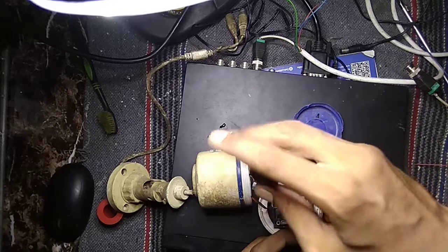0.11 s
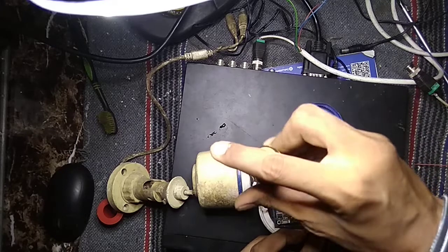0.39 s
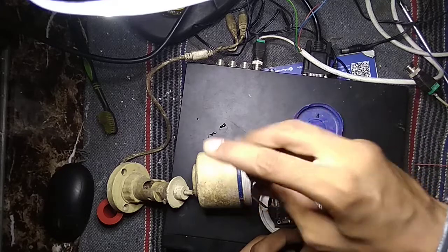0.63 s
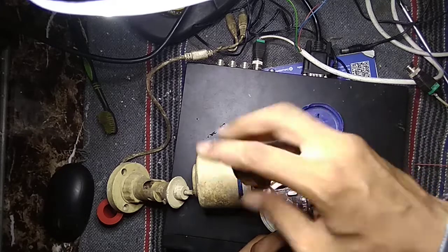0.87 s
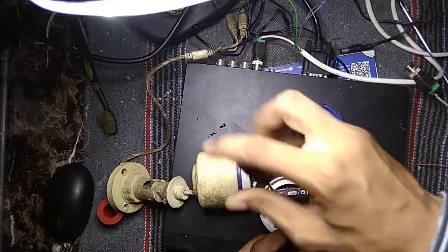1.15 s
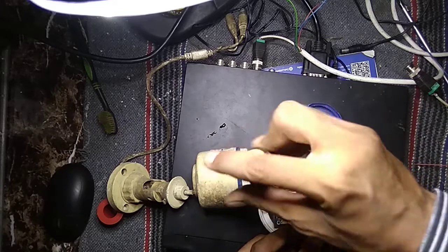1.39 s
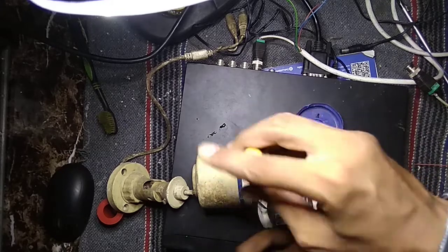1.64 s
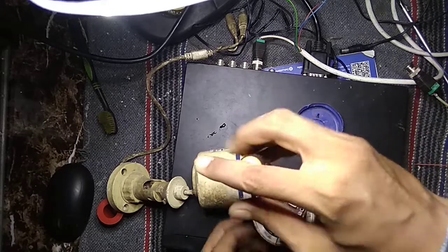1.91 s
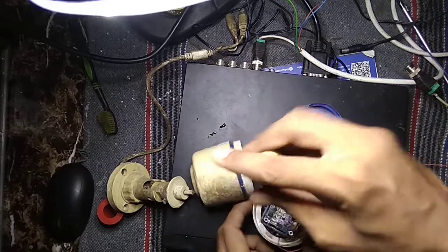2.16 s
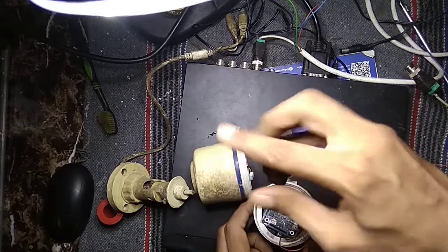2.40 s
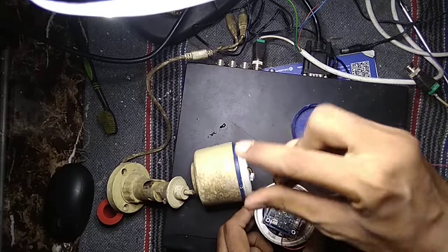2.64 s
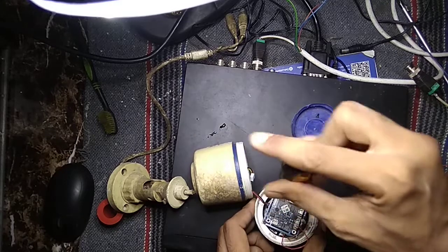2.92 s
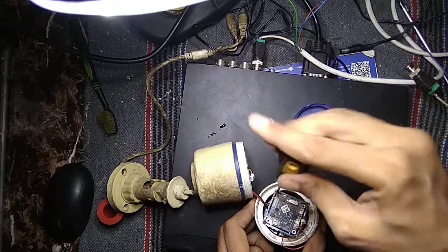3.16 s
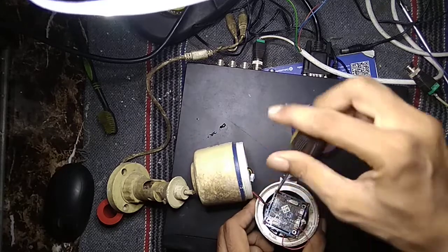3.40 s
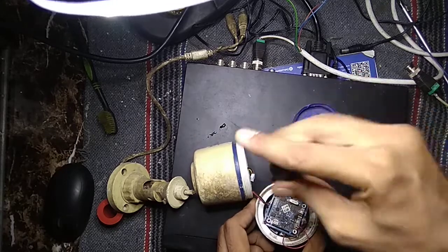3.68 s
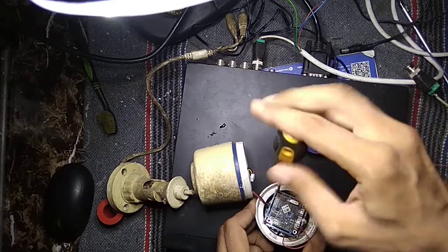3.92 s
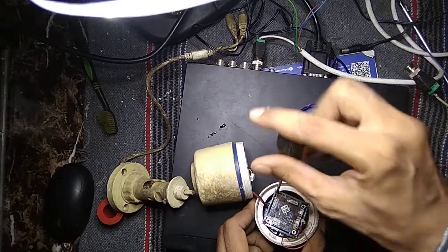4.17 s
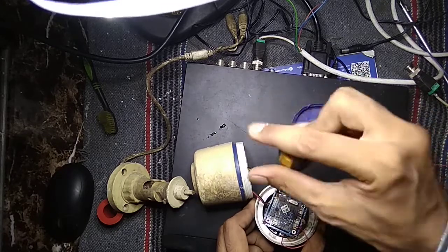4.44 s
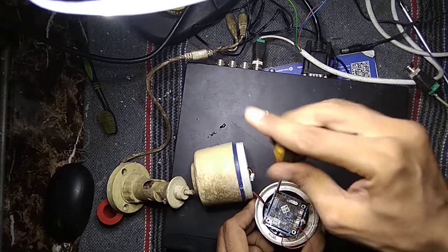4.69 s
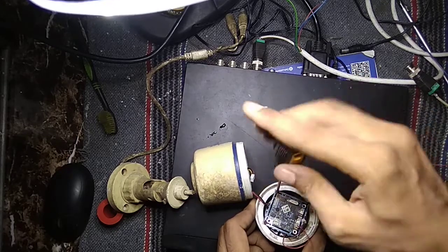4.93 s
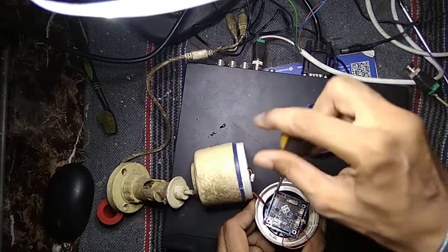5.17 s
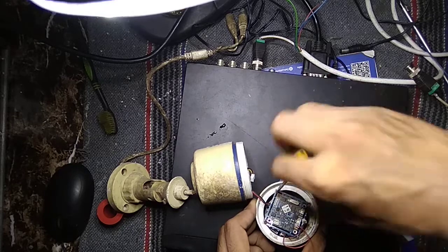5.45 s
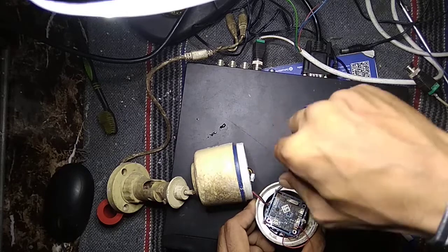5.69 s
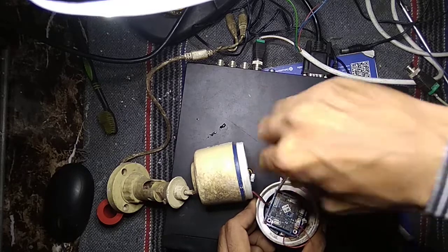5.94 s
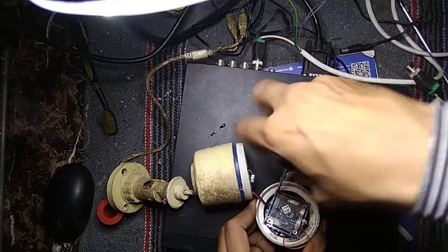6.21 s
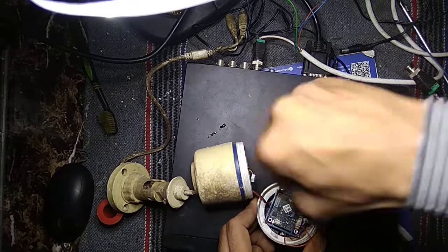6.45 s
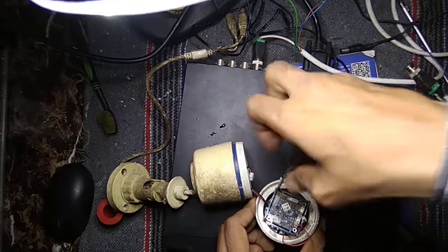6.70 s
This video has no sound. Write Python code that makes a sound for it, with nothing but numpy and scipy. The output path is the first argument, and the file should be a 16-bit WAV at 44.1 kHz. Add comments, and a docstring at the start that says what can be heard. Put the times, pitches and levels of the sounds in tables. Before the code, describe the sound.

Close to the microphone, a small screwdriver works in a plastic housing on a hollow bench. A low wavering hum opens, with a strong double knock almost at once. Gritty scrapes and light plastic pings follow. The steady hum fades after two seconds, leaving a swelling murmur under scattered knocks, one hard near five seconds, then faint taps and a quick closing flurry in a small room.

```python
"""Hands turn a small screwdriver in a plastic lamp housing on a hollow workbench, close to a phone.
A low wavering hum is there from the start, and strong knocks soon ring the bench top and rattle the housing.
Gritty scrapes, light pings of the shell and thin squeaks of hiss come in between; the hum's steady tone
fades out after about two seconds, leaving a murmur that swells and sinks. More knocks follow, one of them
hard at 4.8 s, then faint taps and a closing flurry. A small room answers, over faint microphone hiss."""
import sys
import numpy as np
from scipy import signal
from scipy.io import wavfile
from scipy.ndimage import uniform_filter1d

SR = 44100
rng = np.random.default_rng(int(sys.argv[2]) if len(sys.argv) > 2 else 0)


def int16_out(signal):
    """Quantize to a 16-bit WAV file."""
    q = np.round(np.clip(np.atleast_2d(signal).T, -1, 1) * 32767)
    wavfile.write(sys.argv[1], SR, q.astype(np.int16))


def voltage_ratio(decibels):
    """Convert decibels (scalar or array-like) to amplitude ratios, 20 dB per decade."""
    exponent = np.asarray(decibels, float) / 20
    return 10 ** exponent


N = 301323  # length of the scene in samples

# microphone hiss: (frequency [Hz], relative level per Hz [dB])
HISS_SPECTRUM = [(700, 0.5), (1300, -4.5), (5000, -14), (11800, -12.5), (12900, -24), (15800, -24.5)]
HISS_DB = -87.5
# swells of the hum: (start [s], length [s], hum level at the start [dB], fade [dB per s],
# rumble relative to the hum [dB])
HUM_SWELLS = [(-.1, 0.59, -29.5, 27.5, -11), (0.408, 0.17, -52, 4, 1.5), (0.546, 1.37, -38, 14, -6),
              (1.753, 1.1, -41, 14.5, -7.5), (2.247, 0.16, -49.5, 5, 0), (2.383, 0.73, -37, 41.5, -2.5),
              (2.958, 0.59, -52, 6, -7), (3.654, 0.37, -53, 10, -6.5), (4.014, 0.7, -46.5, 34.5, -1.5),
              (4.758, 0.26, -45.5, 56, -3), (5.083, 0.504, -60, -11, -8), (5.577, 0.13, -56.5, 17, 1),
              (5.859, 0.29, -63, -23, -2.5), (6.217, 0.14, -63.5, 6, -7), (6.42, 0.54, -55, -4, 0.5)]
SWELL_RISE_S, SWELL_DROP_S, QUIET_DB = 0.073, 0.047, -72.5
# faint steady tones above the hum: (frequency [Hz], relative level [dB])
UPPER_HUM_TONES = [(110, -19.5), (150, -11.5), (352, -28.5)]
TONE_ENDS_S, TONE_FADE_S = 2.33, 0.3  # the steady tones are gone at the first; the fade comes just before
# rumble bands above the hum: (frequency [Hz], width [Hz], relative level [dB])
RUMBLE_BANDS = [(86.3, 18, -2), (110.6, 16, -5.5), (142.75, 17, -5.5), (235, 19, -24.5)]
# how long the small room rings: (frequency [Hz], time to fall by 60 dB [s])
ROOM_DECAY = [(300, 0.39), (1500, 0.25), (3500, 0.24), (12000, 0.25)]
# thin squeaks of hiss: (start [s], length [s], level before the swell [dB], first pitch [Hz], last pitch [Hz])
SKIN_SQUEAKS = [(0.663, 0.22, -65, 13740, 14570), (5.411, 0.21, -67, 14700, 14970),
                (5.524, 0.22, -69.5, 11470, 11270), (5.591, 0.24, -66.5, 10600, 10760),
                (6.344, 0.11, -63.5, 12740, 13150), (6.616, 0.25, -66.5, 11800, 13660)]
# light touches that ring one mode of the shell, and the bright cracks of the knocks at 4.1 s and 4.8 s: (start
# [s], frequency [Hz], starting level [dB])
SHELL_PINGS = [(3.782, 2030, -64.5), (1.659, 2330, -65.5), (2.57, 2330, -71), (2.979, 2400, -56.5),
               (4.065, 1670, -61), (4.265, 2330, -68), (4.305, 2270, -68.5), (4.102, 2565, -47),
               (4.584, 2220, -65.5), (4.775, 2330, -59), (4.796, 2570, -49), (5.11, 2380, -63.5),
               (5.63, 2230, -65.5)]
PING_RISE_S, PING_T60_S, PING_WIDTH_HZ = 0.0022, 0.049, 260
# ringing of the housing shell: (frequency [Hz], width [Hz], relative level [dB])
SHELL_MODES = [(1650, 77, -7.5), (2026, 250, -4.5), (2330, 130, -4), (2680, 89, -9.5), (3520, 210, -12.5)]
# colour of the housing rattle: (frequency [Hz], relative level per Hz [dB])
RATTLE_COLOUR = [(600, -2.5), (1000, 7.5), (1280, 6), (1650, 9), (2450, 1.5), (3000, -8), (4200, -8.5),
                 (6500, -20.5)]
# colour of the metal tip, lowest rasp first: (frequency [Hz], relative level per Hz [dB])
TIP_COLOUR = [(3200, -8.5), (7000, -2.5), (9000, 1), (13000, 4.5), (15500, 0.5), (16000, -20.5)]
# ringing of the bench top: (frequency [Hz], relative level [dB], time to fall by 60 dB if not held [s],
# left minus right [dB])
BENCH_MODES = [(134.1, -11.5, 0.18, 2.5), (337.8, -1.5, 0.14, 4.5), (376.4, -5, 0.21, 2),
               (480.3, 3.5, 0.097, 6.5), (537.1, -10.5, 0.15, 4.5), (634.8, -10.5, 0.11, -3),
               (745, -25.5, 0.17, 11), (883.4, -26, 0.15, 9), (988, -25, 0.11, -6),
               (1090.5, -28.5, 0.055, -5.5)]
# faint shuffling on the bench: force when the rumble is at -55 dB, and its change in dB per dB of rumble
SHUFFLE_DB, SHUFFLE_FOLLOWS = -73, 0.94
# scrapes: (start [s], length [s], starting force on the bench [dB], on the housing [dB], at the tip [dB])
SCRAPE_STROKES = [(0.974, 0.093, -77, -84, -75), (1.668, 0.18, -35, -50, -50),
                  (2.052, 0.16, -49.5, -76.5, -67.5), (2.078, 0.062, -68, -80, -55.5),
                  (2.89, 0.16, -59.5, -88, -87), (4.248, 0.14, -65.5, -100, -93.5),
                  (4.766, 0.028, -49, -81, -88.5), (5.091, 0.092, -75, -80, -79),
                  (3.244, 0.066, -77, -84, -76), (5.361, .05, -71, -96, -65),
                  (6.505, 0.064, -54.5, -73.5, -64), (5.85, .4, -67, -94, -95),
                  (6.71, 0.12, -42.5, -73.5, -70.5)]
# for bench, housing and tip: (share of the stroke until full force [0 to 1])
FULL_GRIP_SHARE = [0.15, 0.34, 0.53]
# for bench, housing and tip: (change of force over the stroke [dB])
FORCE_CHANGE_DB = [-10.5, 5, 1.5]
LIFT_S = 0.031  # how long the hand takes to let go
# knocks: (time [s], peak of the thud [dB], tilt towards the low bench modes [dB],
# housing force relative to the thud [dB], tip force relative to the thud [dB])
BENCH_KNOCKS = [(0.294, -27, -0.5, -17.5, -34), (0.311, -16, 3, -22, -38.5),
                (0.677, -43.5, -4.5, -22.5, -22.5), (0.706, -34.5, 0.5, -28, -31),
                (1.213, -47, 3.5, -32.5, -31.5), (1.297, -53, -6.5, -33, -40), (2.211, -30, -5.5, -45, -38),
                (2.219, -31, 0.5, -13, -27), (2.315, -34, -2.5, -25.5, -36.5),
                (2.428, -42.5, 9, -44.5, -47), (2.491, -44.5, 13, -47, -50), (2.61, -32, -1.5, -24, -31.5),
                (2.677, -38.5, -0.5, -25.5, -39), (2.927, -50, 3.5, -42.5, -48),
                (2.974, -39, 0.5, -28, -31), (3.198, -52, -1.5, -21, -43), (3.696, -51, -4, -26, -41),
                (3.77, -37.5, -0.5, -24.5, -29.5), (3.823, -45, -6, -39, -30.5),
                (4.025, -46, 3.5, -44, -37), (4.097, -33, -0.5, -21, -32), (4.292, -49.5, -19, -41, -24),
                (4.599, -53.5, -7, -25, -38), (4.794, -22, -3.5, -32, -41), (5.337, -54, 6, -31, -23),
                (5.437, -53.5, -10, -26, -22.5), (5.827, -52.5, -5.5, -32, -23),
                (5.939, -53, -4.5, -24, -40), (5.976, -43.5, -2.5, -30, -42), (6.196, -46.5, 1.5, -33, -48),
                (6.224, -44, 0.5, -39.5, -37), (6.384, -45, 3, -30, -36), (6.484, -40.5, -3, -25, -37),
                (6.499, -39, -3.5, -32, -42), (6.56, -38.5, -2, -30, -43), (6.606, -36.5, 0, -17.5, -33.5),
                (6.73, -29.5, -8.5, -25, -31), (6.754, -36, -3, -21.5, -27), (6.824, -35.5, 5, -29, -41)]
CONTACT_S = 0.0071  # how long a landing takes to reach full load
SNAP_S = 0.011  # the housing snap is strongest this long after the knock's listed time
LEFT_LAG_SAMPLES = 15  # sound through the air reaches the left side later


def evened(x):
    """Scales a sound to rms 1."""
    return x / np.sqrt(np.mean(x ** 2) + 1e-20)


def read(points, hz):
    """Reads a table at the frequencies hz, along a logarithmic frequency scale."""
    f, value = np.transpose(points)
    return np.interp(np.log(hz + 1), np.log(f + 1), value)


def add(mix, s, sound):
    """Lays a sound into the mix at s seconds."""
    part = mix[..., round(s * SR):][..., :sound.shape[-1]]
    part += sound[..., :part.shape[-1]]


def colour(x, points):
    """Gives noise the listed spectrum with a short filter of energy 1."""
    hz = np.linspace(0, SR / 2, 257)
    outside = (hz < points[0][0]) | (hz > points[-1][0])
    taps = signal.firwin2(255, hz, voltage_ratio(np.where(outside, -80, read(points, hz))), fs=SR)
    return signal.oaconvolve(x, (taps / np.linalg.norm(taps))[None], "same", axes=1)


def resonate(x, hz, width):
    """A resonance that follows the curve hz: shift it down to zero, smooth twice, shift back up."""
    turn = np.exp(2j * np.pi * np.cumsum(hz * np.ones(x.shape[-1])) / SR)
    r = np.exp(-np.pi * width / SR)
    once = signal.lfilter([1 - r], [1, -r], x / turn)
    twice = signal.lfilter([1 - r], [1, -r], once)
    return 2 * (turn * twice).real


def ramp(t, length, rise, drop):
    """Smooth rise, hold and drop within a span."""
    return np.sin(np.pi / 2 * np.clip(np.minimum(t / rise, (length - t) / drop), 0, 1)) ** 2


def grit(shape, per_s, spread_db):
    """Sparse contacts of random sign and very uneven size, rms 1."""
    size = voltage_ratio(spread_db * np.minimum(rng.exponential(1, shape), 4))
    happens = rng.random(shape) < per_s / SR
    return evened(size * rng.standard_normal(shape) * happens)


def microphone_hiss():
    """Steady coloured noise, independent in the two microphones."""
    return voltage_ratio(HISS_DB) * colour(rng.standard_normal((2, N)), HISS_SPECTRUM)


def room(x):
    """Sparse echoes of random sign, each band dying at its own speed, other echoes for each side."""
    taps = np.zeros((2, SR // 2))
    at = np.arange(200, SR // 2 - 20, 20)
    at = at + rng.integers(0, 20, (2, len(at)))
    np.put_along_axis(taps, at, rng.choice([-1., 1.], at.shape), 1)
    hz, t, z = signal.stft(taps, SR, nperseg=256)
    decay = voltage_ratio(-60 * t / read(ROOM_DECAY, hz)[:, None])
    tail = signal.istft(z * decay, SR, nperseg=256)[1]
    return signal.fftconvolve(x[None], tail / np.linalg.norm(tail[0]), axes=1)[:, :N]


def swells():
    """Gains of the hum and of the rumble: each swell rises, changes steadily in dB and drops out."""
    t, gains = np.arange(N) / SR, np.full((2, N), voltage_ratio(QUIET_DB))
    for s, length, db, fade, rumble_db in HUM_SWELLS:
        level = voltage_ratio(db - fade * np.clip(t - s, 0, length))
        swell = level * ramp(t - s, length, SWELL_RISE_S, SWELL_DROP_S)
        gains += swell * voltage_ratio([[0], [rumble_db]])
    return gains


def hum(tone_gain, rumble_gain):
    """A wavering low tone, murmur and rumble bands through the bench, much alike in both microphones."""
    noise = rng.standard_normal((4, N))
    waver_hz = 1.7 * evened(uniform_filter1d(uniform_filter1d(noise[3], 2500), 2500))
    noise = noise[0] + 0.47 * noise[1:3]  # a shared part and one for each side
    turns = np.cumsum(54 + waver_hz) / SR + np.array([[0], [.07]])  # one side hears it a little ahead
    steady = np.clip((TONE_ENDS_S - np.arange(N) / SR) / TONE_FADE_S, 0, 1)
    upper = sum(voltage_ratio(db) * np.sin(2 * np.pi * np.cumsum(hz + 1.5 * waver_hz) / SR)
                for hz, db in UPPER_HUM_TONES)
    # the murmur is stronger once the steady tone has gone
    murmur = (.75 - .45 * steady) * evened(resonate(noise, 50, 33))
    tone = steady * (1.39 * np.sin(2 * np.pi * turns) + upper) + murmur
    rumble = sum(voltage_ratio(db) * resonate(noise, hz, width) / np.sqrt(width) for hz, width, db in RUMBLE_BANDS)
    rumble = evened(rumble * voltage_ratio(1.6 * waver_hz))  # swells as the tone rises in pitch
    return tone_gain * tone + rumble_gain * rumble


def squeaks():
    """Narrow gliding bands of hiss as skin slides on the handle."""
    out = np.zeros(N)
    for s, length, db, first_hz, last_hz in SKIN_SQUEAKS:
        hz = np.linspace(first_hz, last_hz, round(length * SR))
        # rises a little faster than it sinks
        swell = abs(np.sin(np.linspace(0, np.pi, len(hz)) ** 0.79 * np.pi ** .2))
        band = evened(resonate(rng.standard_normal(len(hz)), hz, width=310))
        add(out, s, voltage_ratio(db) * swell * band)
    return out


def pings():
    """Short gritty touches and snaps, each heard through one narrow resonance of the plastic shell."""
    out, t = np.zeros(N), np.arange(SR // 12) / SR
    for s, hz, db in SHELL_PINGS:
        ringing = evened(resonate(grit(len(t), per_s=5900, spread_db=2.5), hz, PING_WIDTH_HZ))
        add(out, s, voltage_ratio(db - 60 * t / PING_T60_S) * np.minimum(t / PING_RISE_S, 1) * ringing)
    return out


def bench_ring(low_db=0, spread_db=0, held=1):
    """Dying modes of the bench top; the spot struck favours some, and a pressing hand shortens them."""
    hz, db, t60, pan_db = np.transpose(BENCH_MODES)[..., None]
    t, spot = np.arange(SR // 3) / SR, rng.standard_normal((2,) + hz.shape)
    db = db + np.where(hz < 420, low_db, -low_db) + spread_db * spot[0]
    hz = hz * (1 + 0.0037 * spread_db * spot[1])
    swing_in = (1 - np.exp(-t / 0.0027)) ** 2  # the top takes a moment to start moving
    modes = swing_in * voltage_ratio(db - 60 * held * t / t60) * np.sin(2 * np.pi * hz * t)
    return np.array([(voltage_ratio(side * pan_db / 2) * modes).sum(0) for side in (1, -1)])


def rubbing(rumble_gain):
    """Gritty sliding forces; rows: on the bench, on the housing, at the metal tip, and the shuffling."""
    out, grip, change_db = np.zeros((4, N)), np.c_[FULL_GRIP_SHARE], np.c_[FORCE_CHANGE_DB]
    for s, length, *levels_db in SCRAPE_STROKES:
        t = np.arange(0, length, 1 / SR)
        # a stroke loads the bench first, then housing and tip
        rub = voltage_ratio(np.c_[levels_db] + change_db * t / length) * ramp(t, length, grip * length, LIFT_S)
        clumps = evened(uniform_filter1d(rng.standard_normal(len(t)), 250))  # slips come in clumps
        bench_grit = voltage_ratio(0.95 * clumps) * grit(len(t), per_s=4000, spread_db=3.5)
        add(out[:1], s, rub[:1] * bench_grit)
        part_grit = evened(voltage_ratio(2.7 * clumps)) * grit(rub[1:].shape, per_s=5000, spread_db=2.5)
        add(out[1:3], s, rub[1:] * part_grit)
    lumps = voltage_ratio(6.2 * evened(uniform_filter1d(rng.standard_normal(N), 1500)))
    shuffle = voltage_ratio(SHUFFLE_DB) * (rumble_gain / voltage_ratio(-55)) ** SHUFFLE_FOLLOWS
    out[3] = shuffle * evened(lumps) * rng.standard_normal(N)
    return out


def knocks():
    """Bench thuds in two channels from soft gritty landings, and the snapping forces on housing and tip."""
    wood, force, t = np.zeros((2, N)), np.zeros((2, N)), np.arange(4000) / SR
    for s, db, low_db, rattle_db, click_db in BENCH_KNOCKS:
        # a soft, skidding landing; then the part rocks a little longer in separate small contacts
        landing = np.sin(np.pi * np.minimum(t / CONTACT_S, 2) / 2) ** 2
        settle = 0.43 * np.exp(-t / (3.2 * CONTACT_S)) * np.minimum(t / CONTACT_S, 1)
        rocking = grit(len(t), per_s=320, spread_db=1.8)
        press = landing * grit(len(t), per_s=3000, spread_db=1.5) + settle * rocking
        press = uniform_filter1d(press, size=12)
        thud = signal.fftconvolve(press[None], bench_ring(low_db, spread_db=1.46), axes=1)
        add(wood, s - .009, voltage_ratio(db) * thud / abs(thud.mean(0)).max())
        late = t - CONTACT_S  # the housing snaps at full load
        blow = np.exp(np.minimum(late / 0.003, -late / 0.011))
        rocking_size = uniform_filter1d(abs(rocking), size=60) / abs(rocking).mean()
        crack = blow + 0.34 * (late > 0) * np.exp(-late / 0.01) * rocking_size
        snaps = crack * grit((2, len(t)), per_s=6000, spread_db=6.0)
        # the blow, not the luck of the grit, sets the energy
        snaps *= np.linalg.norm(crack) / np.linalg.norm(snaps, axis=1, keepdims=True)
        add(force, s - CONTACT_S + SNAP_S, voltage_ratio(db + np.array([[rattle_db], [click_db]])) * snaps)
    return wood, force


def scene():
    """Bench through the table, housing and tip through the air, then the room and the hum."""
    tone_gain, rumble_gain = swells()
    wood, (snap, tick) = knocks()
    slide, rattle, rasp, shuffle = rubbing(rumble_gain)
    for drive, ring in ((slide, bench_ring(low_db=-5.5, held=1.4)), (shuffle, bench_ring())):
        ring = ring / np.linalg.norm(ring.mean(0))
        wood = wood + signal.oaconvolve(drive[None], ring, axes=1)[:, :N]
    housing = snap + rattle
    # wide and narrow modes are evened out by their width
    shell = sum(voltage_ratio(db) * resonate(housing, hz, width) * np.sqrt(1500 / width)
                for hz, width, db in SHELL_MODES)
    air = shell + colour(housing[None], RATTLE_COLOUR)[0] + pings()
    # a tap of the tip lacks the lowest rasp
    tip = colour(rasp[None], TIP_COLOUR)[0] + colour(tick[None], TIP_COLOUR[1:])[0]
    bright = tip + squeaks()
    # the hand works right of the phone: the left side hears it later, and its treble softer
    direct = np.array([np.roll(air, LEFT_LAG_SAMPLES), air])
    direct = direct + np.array([np.roll(bright, LEFT_LAG_SAMPLES), bright]) * voltage_ratio([[-4.5], [-1.2]])
    echoes = voltage_ratio(-13.5) * room(wood.mean(0)) + voltage_ratio(-1.5) * room(air + bright)
    return wood + direct + echoes + hum(tone_gain, rumble_gain)


def suppress(x, floor_db, slope):
    """Noise suppressor: each small band is turned down the nearer it comes to a fixed floor."""
    z = signal.stft(x, nperseg=1024, noverlap=768)[2]
    power = uniform_filter1d((abs(z) ** 2).mean(0), size=3, axis=1)
    gain = (power / (power + voltage_ratio(2 * floor_db))) ** slope
    return signal.istft(z * gain, nperseg=1024, noverlap=768)[1][:, :N]


def low_pass(x):
    """Removes everything above the highest recorded frequency."""
    return signal.sosfilt(signal.butter(12, 15730, fs=SR, output="sos"), x)


def record(dry):
    """The microphone drops the deepest bass, the suppressor cuts faint tails, and faint hiss stays."""
    dry = signal.sosfilt(signal.butter(2, 40, "highpass", fs=SR, output="sos"), dry)
    mix = suppress(dry, floor_db=-100, slope=1.0) + microphone_hiss()
    return low_pass(mix)


dry = scene()
out = record(dry)
int16_out(out)
```